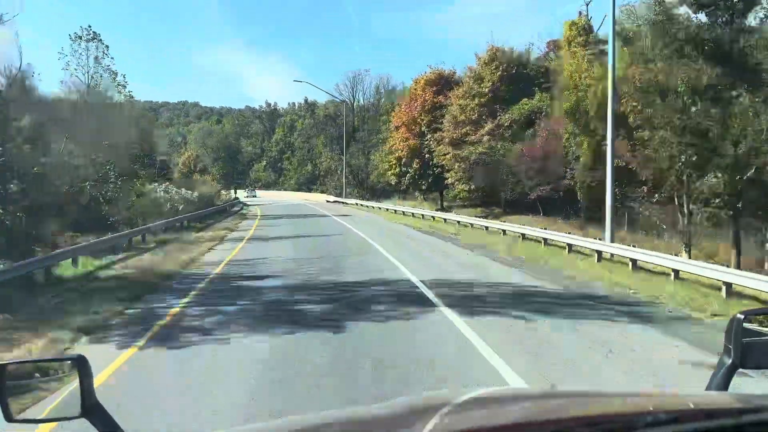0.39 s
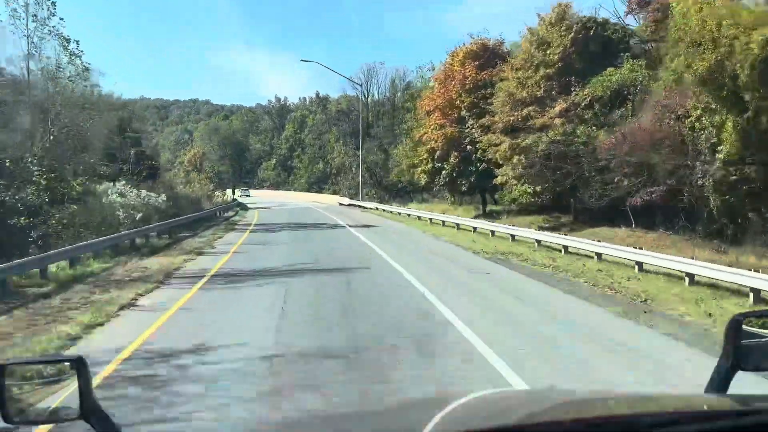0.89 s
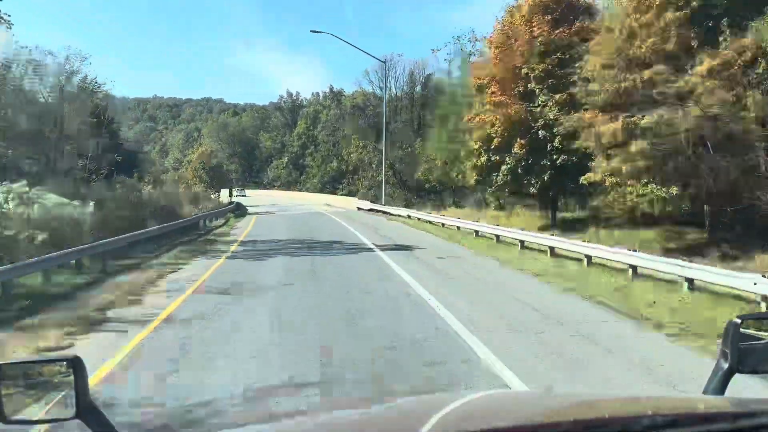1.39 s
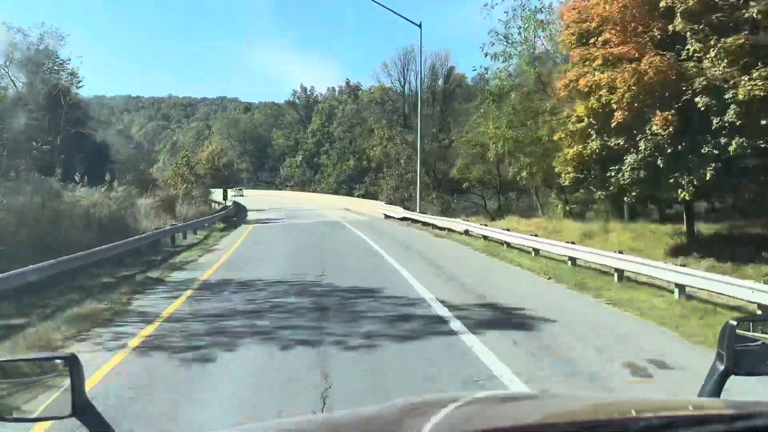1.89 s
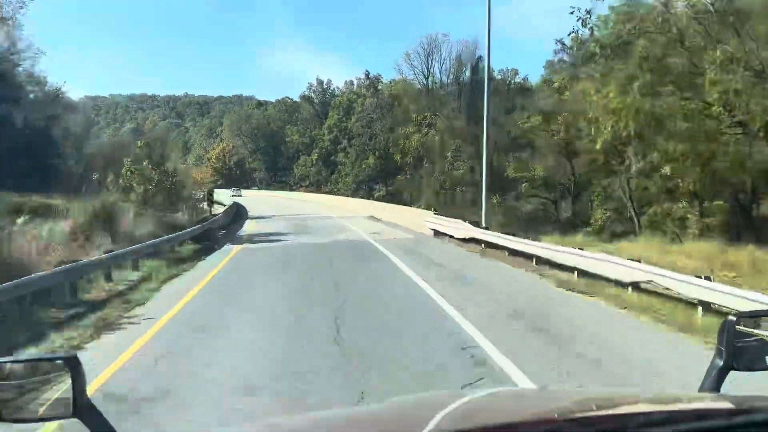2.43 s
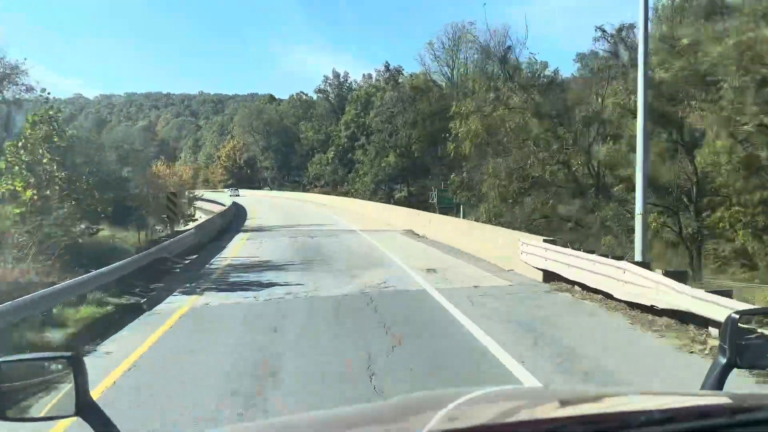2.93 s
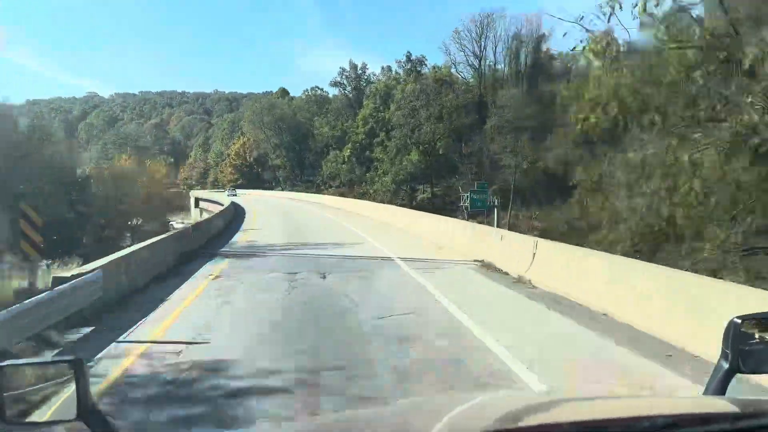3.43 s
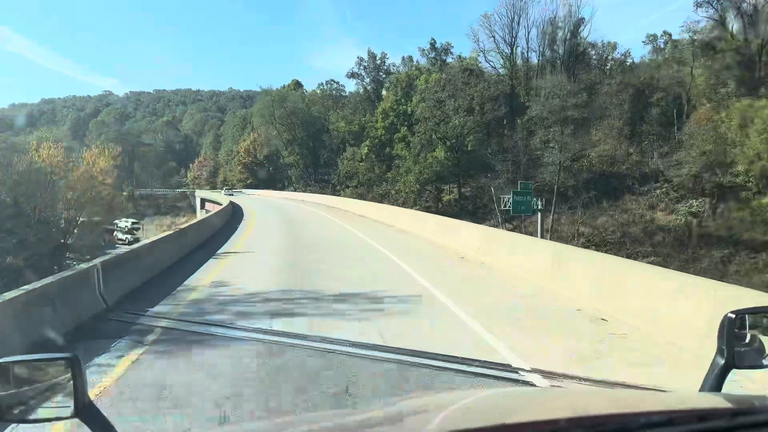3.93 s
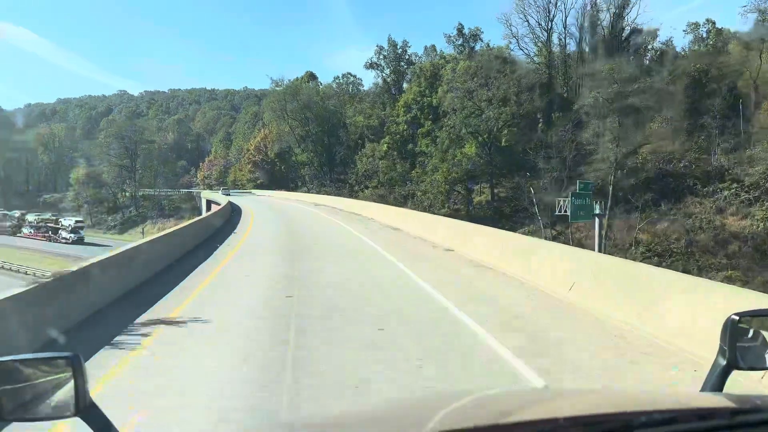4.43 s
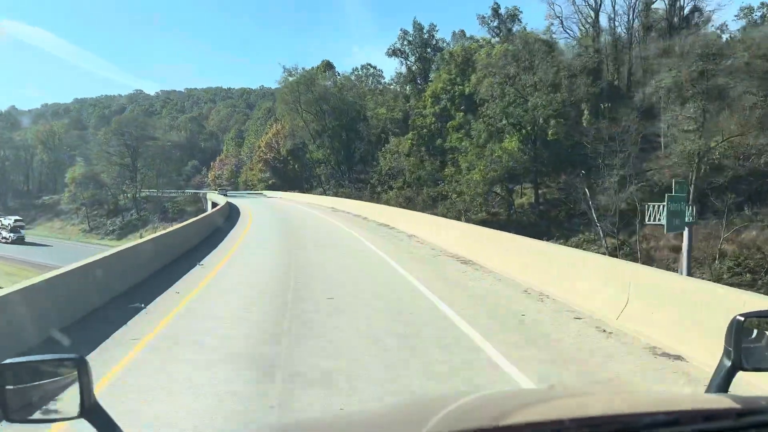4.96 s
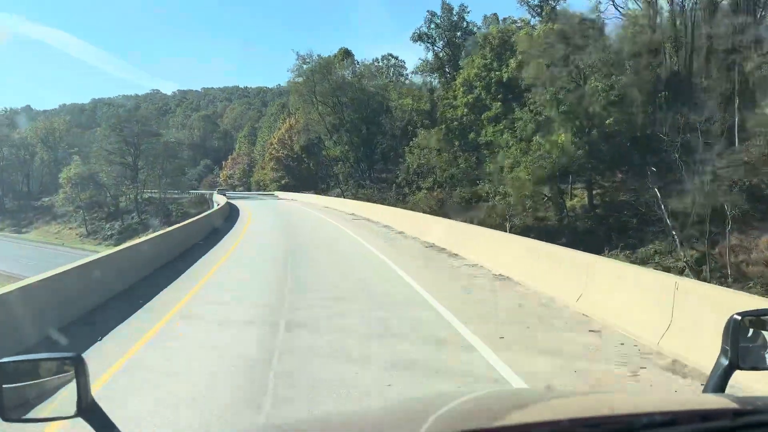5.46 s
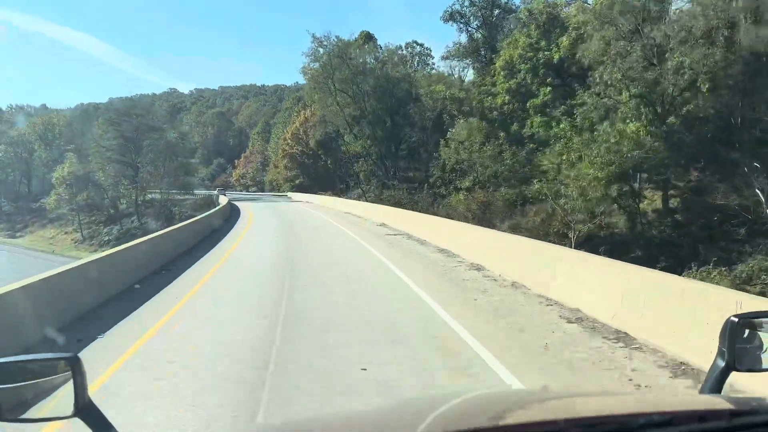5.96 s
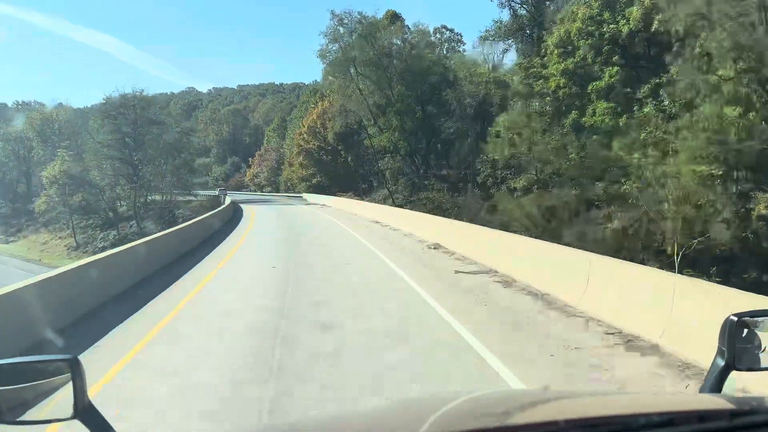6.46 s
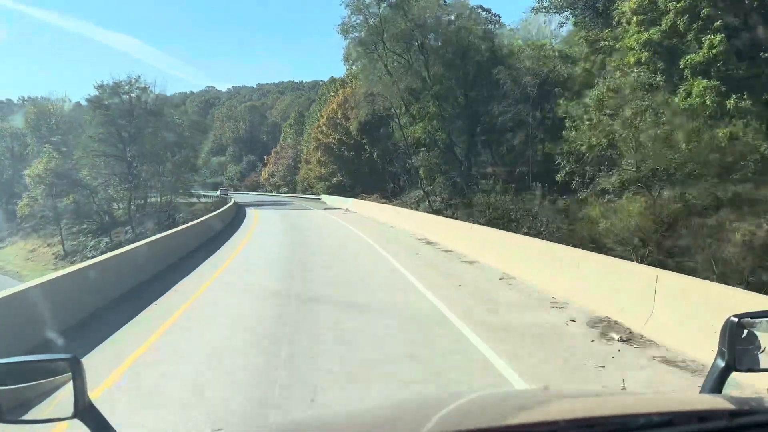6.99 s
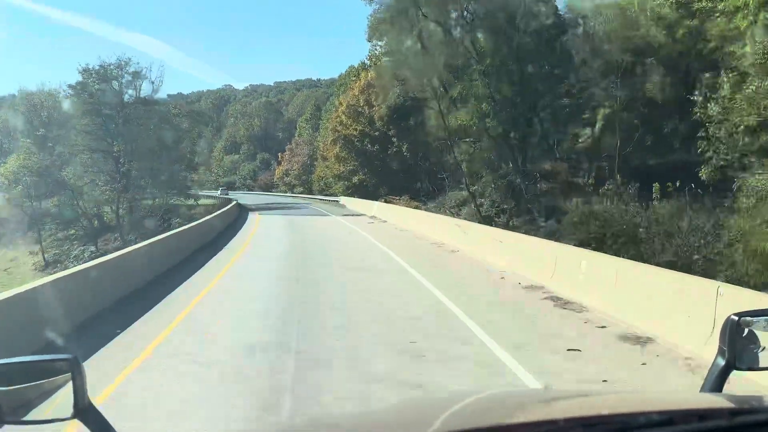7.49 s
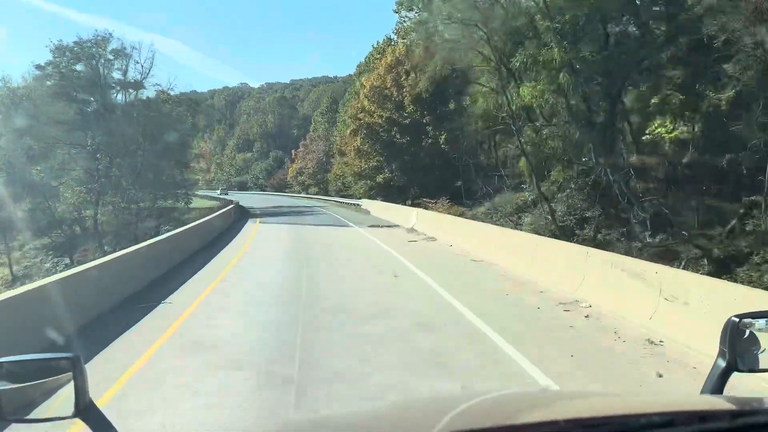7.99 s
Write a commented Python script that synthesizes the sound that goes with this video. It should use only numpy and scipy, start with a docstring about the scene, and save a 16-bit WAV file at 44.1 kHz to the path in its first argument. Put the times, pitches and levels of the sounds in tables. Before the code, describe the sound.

Inside a heavy truck cab, picked up near the windscreen, a low diesel drone holds almost one pitch, slightly wavering, over dense bass rumble, muffled tyre roar and light wind. The first 3.5 seconds are smooth, with tiny panel ticks at 0.3 and 0.9 and a very faint, high turbo whistle between about 1 and 3.3. At 3.55 broken patches hit: rapid dull thuds boom through the cab, tyre noise swells, plastic trim chatters and panels creak. Three dry axle slaps crack over a bridge joint at 4.26, 4.35 and 4.43. Jolts and rattles continue, weakening until 5.3. From 5.6 the engine softens off throttle on smoother concrete; a brief air-valve hiss spits from the left at 5.8, with a tiny one at 6.15. Isolated trim rattles come at 6.6, 7.35 and, strongest, 7.9. Engine power returns around 7.6 and the drone continues to the end near 8.1.

```python
"""Heavy truck cab at steady speed

Heard by a phone near the windscreen: a six-cylinder diesel drones as a stack of wavering cosines under
rumble, roar and wind made of flickering noise bands. A patched stretch jolts ringing body modes, axles slap
a bridge joint in bursts of falling-spectrum noise, trim rattles as noise through plastic modes and panels
creak as narrow noise. The driver eases off for a while, an air valve puffs hiss from the left, and the
turbo whistles faintly as one gliding sine."""
import sys
import numpy as np
from scipy import signal
from scipy.fft import rfft, irfft, next_fast_len
from scipy.io import wavfile
from scipy.ndimage import uniform_filter1d, minimum_filter1d

SR = 44100
rng = np.random.default_rng(int(sys.argv[2]) if len(sys.argv) > 2 else 0)


def makeup_ratio(level_db):
    """Linear amplitude ratio for a level in decibels (20 dB per factor of ten)."""
    decades = np.asarray(level_db, float) / 20
    return 10 ** decades


def file_out(sig):
    """Save sig as 16-bit WAV at sys.argv[1]."""
    # one column per channel
    cols = np.atleast_2d(sig).T
    # limit, then scale
    lim = np.clip(cols, -1, 1)
    pcm = np.round(lim * 32767).astype(np.int16)
    wavfile.write(sys.argv[1], SR, pcm)


N = 358091
T = np.arange(N) / SR  # s
F = np.maximum(np.fft.rfftfreq(next_fast_len(N), 1 / SR), 1)  # Hz

# driver's foot and engine speed: t/s, throttle/0-1, firing f/Hz
THROTTLE = [(0, 0.89, 55.29), (2.3, 0.84, 55.55), (3.5, 1, 55.63), (4.2, 0.71, 56.42), (5.2, 0.72, 56.08),
            (5.6, 0.24, 55.86), (6.2, 0, 55.44), (7.0, 0, 55.27), (7.5, 0.2, 55.48), (7.62, 0.74, 55.62),
            (8.12, 0.67, 55.55)]
# road under the wheels, from smooth asphalt over patches and joint to concrete deck:
# t/s, roughness/1 (1 is very rough)
ROUGHNESS = [(0, 0.09), (3.52, 0.08), (3.55, 0.85), (3.68, 1.11), (3.79, 0.89), (3.9, 0.84), (4.28, 0.8),
             (4.32, 0.3), (4.4, 0.7), (4.55, 0.5), (4.65, 0.86), (4.95, 0.35), (5.6, 0.07), (8.12, 0.17)]

# drone partials: order/multiple of the engine cycle, level/dB at full throttle on a smooth road,
# loss/dB off throttle
ENGINE_ORDERS = [(4, -30.5, 4.5), (5, -42.5, 3), (6, -13, 3), (8, -38, 2.5), (11, -36.5, 3), (12, -15, 15),
                 (14, -36, 6.5), (15, -21.5, 6.5), (16, -37.5, 1.5), (17, -44, 6), (18, -32.5, 3.5),
                 (21, -36.5, 9), (22, -33, 10), (28, -37.5, -1), (43, -43, 2)]
CYLINDERS = 6
SHAKE_DB = 4.5  # extra wavering of the drone, and drop in its level, at roughness 1
ENGINE_PAN_DB = -0.5  # left minus right

# relative spectrum of tyres, wind and engine bay: f/Hz, level/dB
CABIN_SPECTRUM = [(20, -26), (32, -9), (48, -3), (90, -7), (130, -9), (200, -12.5), (280, -16), (350, -21),
                  (540, -23.5), (720, -32.5), (1240, -38.5), (1800, -52.5), (3500, -57), (8350, -56),
                  (10000, -61.5), (13000, -62.5), (15600, -60)]
# cab resonances on top of it: f/Hz, width/Hz, boost/dB
CABIN_BOOMS = [(197.4, 34, 5.5), (387, 14, 4), (548, 13, 2.5), (822, 88, 4), (2400, 1380, 6),
               (6200, 780, 2.5)]
# stereo width of the cabin noise: f/Hz, side minus mid/dB
CABIN_WIDTH = [(60, -14), (200, -7), (380, -4), (700, -0.5), (1290, 2.5), (2380, -2), (8120, -1),
               (12000, 0)]
# stereo lean of the cabin noise: f/Hz, left minus right/dB
CABIN_LEAN = [(110, -3.5), (380, 1), (1290, -1.5), (2380, -1.5), (4400, 3.5), (12000, 0)]
# gain at roughness 1: body rumble/dB, tyre roar/dB, trim buzz/dB
ROUGH_GAINS = (2, 5.5, 4)
CABIN_DB = -21  # centre signal before road gains, flicker and lean
RUMBLE_S, RUMBLE_DB = 3.6, 3.5  # bass rumble is stronger from the rough patch onwards

# loose trim chattering: t/s, ring level/dB, tilt/dB (above 0 a dull knock, below 0 a bright ring)
RATTLES = [(3.553, -52.5, -4), (3.592, -49, 0), (3.659, -44, 3), (3.71, -49, -1.5), (3.773, -47, 7.5),
           (3.966, -57, -18), (4.685, -53, -8), (4.724, -45, -10), (5.069, -47, 0.5), (6.613, -45.5, 0.5),
           (7.347, -41, -2.5), (7.914, -37, -1.5)]
# resonances of the plastic parts: f/Hz, width/Hz, level/dB
TRIM_MODES = [(1110, 450, -2.5), (1460, 140, 3), (1880, 73, -8), (2470, 260, -0.5), (2700, 300, -8),
              (4070, 270, -8), (5530, 300, -9)]
# relative spectrum of the small ticking: f/Hz, level/dB
PATTER_SPECTRUM = [(300, -13.5), (800, 5.5), (1500, -3), (2500, -7.5), (5000, -13.5), (9000, -16.5),
                   (15600, -32.5)]
KNOCK_DB, SIZZLE_DB = 3.5, -10.5  # low and high band against the ring
SIZZLE_TILT = -0.68  # share of the tilt in the high band
SCRAPE_DB = -8  # broad scrape against the modes
PATTER_DB, PATTER_RANGE_DB = -39.5, 17  # ticking at roughness 1; its fall at roughness 0

# panels creaking or clunking on one narrow resonance: t/s, level/dB, f/Hz, length/s
CREAKS = [(0.26, -45, 2400, .012), (0.863, -51, 2400, .01), (3.78, -45, 2710, .02),
          (3.798, -43.5, 1450, 0.035), (4.09, -47, 2150, .04), (4.139, -44, 2640, .02),
          (4.253, -30.5, 1070, 0.011), (4.347, -39, 1880, 0.011), (4.425, -43, 1890, .012),
          (6.611, -45.5, 2320, 0.014), (7.913, -36.5, 2380, 0.018)]
CREAK_WIDTH_HZ = 190

# turbo whistle: t/s, f/Hz, level/dB
TURBO = [(0.9, 9630, -76), (1.7, 9560, -67), (2.37, 9440, -65), (2.9, 9580, -69), (3.3, 9640, -79)]

# wheels over cracks: t/s, push level/dB at 90 Hz, tilt/dB per octave (below 0 a deep thud, above 0 a hard knock)
JOLTS = [(3.555, -19.5, 5), (3.59, -20.5, -3.5), (3.701, -23, -1), (3.80, -21, -4.5), (3.89, -22, -2.5),
         (3.98, -21.5, -5), (4.05, -18.5, 0.5), (4.10, -20.5, 2.5), (4.169, -24, -2), (4.28, -20, -1),
         (4.471, -20.5, -9), (4.625, -20, 2), (4.69, -16.5, -7.5), (4.831, -23.5, -8), (4.951, -28, -6),
         (5.109, -24, -5), (5.26, -30, -10)]
# modes of the cab body: f/Hz, level/dB, decay t60/s
BODY_MODES = [(40.9, 3, 0.26), (60.4, 0, 0.18), (86.6, 6.5, 0.15), (111.9, 3.5, 0.22), (150.4, 2.5, 0.09),
              (205, -1.5, 0.06), (267, -2.5, 0.05), (423, -8, 0.03)]

# axles over the steel joint: t/s, level/dB, spectral corner f/Hz, rise/s
SLAPS = [(4.257, -27.5, 1004, 0.0088), (4.351, -31, 2900, .004), (4.432, -32, 2900, .004)]
SLAP_LOW_SLOPE, SLAP_HIGH_SLOPE = -1.5, -8.5  # dB per octave below and above the corner
SLAP_HOLD_S, SLAP_TAIL_S, SLAP_TOP_HZ = 0.008, 0.016, 8200

# puffs of the air valve: t/s, level/dB before stereo placing, length/s
PUFFS = [(5.758, -47, 0.0022), (5.797, -34, 0.018), (6.148, -43.5, 0.0024)]
# relative spectrum of the hiss: f/Hz, level/dB
PUFF_SPECTRUM = [(2000, -33), (3000, -4), (4000, -11.5), (6000, 2.5), (10000, -6), (13500, -4.5),
                 (16000, -10.5)]

GAP_LOW_HZ, GAP_HIGH_HZ = 10350, 12350  # treble band missing from the centre
MID_TOP_HZ, SIDE_TOP_HZ = 15700, 13100


def lines(x):
    """Sound to spectrum on the frequencies F."""
    return rfft(x, next_fast_len(N))


def wave(spectrum):
    """Spectrum back to sound."""
    return irfft(spectrum, next_fast_len(N))[..., :N]


def curve(table):
    """Columns of a time table, sample by sample."""
    s, *columns = np.transpose(table)
    return [np.interp(T, s, c) for c in columns]


def colour(table, hz=F):
    """Level in dB of a spectrum table at any frequency, drawn on a log frequency axis."""
    f, db = np.transpose(table)
    return np.interp(np.log(hz), np.log(f), db)


def shaped(gain, x):
    """A sound through a spectral gain."""
    return wave(lines(x) * gain)


def rms(x):
    """Root mean square size."""
    return np.sqrt(np.mean(x ** 2))


def unit(x):
    """Scale to rms 1."""
    return x / rms(x)


def walk(rate):
    """Random levels held 1 / rate s and slewed twice; rms about 1."""
    k = int(SR / rate)
    steps = np.repeat(rng.standard_normal(N // k + 1), k)
    return unit(uniform_filter1d(uniform_filter1d(steps, k), k)[:N])


def pan(x, db):
    """Place a sound by its level difference, left minus right."""
    return x * makeup_ratio(np.array([db / 2, -db / 2]).reshape(2, -1))


def ring(x, hz, t60):
    """One mode as a double pole: it swells to about size 1 after a unit push, then dies away."""
    span = t60 * SR / np.log(1000)
    pole = np.exp(2j * np.pi * hz / SR - 1 / span)
    return signal.lfilter([np.e / span], [1, -2 * pole, pole ** 2], x).imag


def burst(s, db, length, rise=.004, tail=.011):
    """Envelope that ramps up, holds until length, then dies away exponentially (times in s)."""
    t = T - s
    return makeup_ratio(db) * np.clip(t / rise, 0, 1) * np.exp(-np.maximum(t - length, 0) / tail)


def engine():
    """Orders of the four-stroke cycle start each cycle nearly in phase; every one wavers a little."""
    throttle, firing_hz = curve(THROTTLE)
    roughness, = curve(ROUGHNESS)
    hz = firing_hz * (1 + .0005 * walk(1.522))
    cycle = 2 * np.pi * np.cumsum(hz / CYLINDERS) / SR
    shake_db = SHAKE_DB * roughness
    drone = 0
    for order, db, loss_db in ENGINE_ORDERS:
        waver_db = 0.45 * walk(2.7) + shake_db * (walk(9) - 1)
        size = makeup_ratio(db - loss_db * (1 - throttle) + waver_db)
        drone = drone + np.sqrt(2) * size * np.cos(order * cycle + 0.057 * walk(7.8))
    return pan(drone, ENGINE_PAN_DB)


def cabin():
    """Overlapping noise bands flicker; rumble rules the bass, tyre roar the middle, buzz the top."""
    roughness, = curve(ROUGHNESS)
    rises = [db * roughness for db in ROUGH_GAINS]
    rises[0] = rises[0] + RUMBLE_DB * (T > RUMBLE_S)
    booms = sum(boost / (1 + ((F - f) / width * 2) ** 2) for f, width, boost in CABIN_BOOMS)
    gain = makeup_ratio(colour(CABIN_SPECTRUM) + booms)
    mid, side = lines(rng.standard_normal((2, N))) * unit(gain) * makeup_ratio(CABIN_DB)
    # in the low middle the roar leads on the left: part of the side is the mid a quarter cycle ahead
    ahead = np.clip(.5 / (1 + np.log2(F / 700) ** 2), 0, 1)
    side = (np.sqrt(1 - ahead ** 2) * side + 1j * ahead * mid) * makeup_ratio(colour(CABIN_WIDTH))
    out, gust = 0, walk(5.4)
    for octave in np.arange(4, 14.5, .5):  # log2 of the band centre in Hz
        window = np.cos(np.pi * np.clip(np.log2(F) - octave, -.5, .5)) ** 2
        m, s = wave(mid * window), wave(side * window)
        # 0 is rumble, 1 roar, 2 buzz; bands in between blend two of them
        region = np.interp(octave, np.log2([80, 500, 3000]), [0, 1, 2])
        rise = sum(max(0, 1 - abs(region - k)) * r for k, r in enumerate(rises))
        flicker = 0.17 * region * gust + 0.93 * walk(14)
        stereo = makeup_ratio(rise + flicker) * np.array([m + s, m - s])
        out = out + pan(stereo, colour(CABIN_LEAN, 2 ** octave))
    return out


def trim():
    """Plastic parts chatter as grainy noise bursts ringing at their modes over a broad scrape."""
    modes = sum(makeup_ratio(db) / (1 + 2j * (F - f) / width) for f, width, db in TRIM_MODES)
    body = makeup_ratio(SCRAPE_DB) * 2000 / (F + 2000) + modes
    body = body * F ** 2 / (F ** 2 + 450 ** 2) / (1 + (F / 8000) ** 2)  # thin bass, soft top
    ticks = rng.standard_normal((2, N)) * makeup_ratio(2.2 * walk(400))
    low, high = 1 / (1 + (F / 1300) ** 6), 1 / (1 + (3300 / F) ** 6)
    bands = low, 1 - low - high, high
    times, ring_db, tilt = np.transpose(RATTLES)
    levels = ring_db + KNOCK_DB + tilt, ring_db, ring_db + SIZZLE_DB + SIZZLE_TILT * tilt
    spectrum = 0
    for band, band_db in zip(bands, levels):
        runs = sum(burst(s, db, .012) for s, db in zip(times, band_db))
        spectrum = spectrum + lines(ticks * runs) * body * band / rms(np.abs(body) * band)
    # a rough road keeps smaller parts ticking between the big knocks
    roughness, = curve(ROUGHNESS)
    patter = makeup_ratio(PATTER_DB + PATTER_RANGE_DB * (roughness - 1) + 3.5 * walk(160))
    return wave(spectrum + lines(ticks * patter) * unit(makeup_ratio(colour(PATTER_SPECTRUM))))


def creaks():
    """Each panel resonance sounds as slow noise on a carrier, fluttering in size and phase."""
    lowpass = 1 / (1 + (2 * F / CREAK_WIDTH_HZ) ** 2)
    along, across = unit(shaped(lowpass, rng.standard_normal((2, 2, N))))
    out = np.zeros((2, N))
    for s, db, hz, length in CREAKS:
        near = slice(int(s * SR), int((s + length + .1) * SR))
        turn = 2 * np.pi * hz * T[near]
        flutter = along[:, near] * np.cos(turn) + across[:, near] * np.sin(turn)
        out[:, near] += burst(s, db, length)[near] * flutter
    return out


def turbo():
    """A thin sine whistle whose pitch sags and recovers, fading in and out."""
    hz, db = curve(TURBO)
    start, end = TURBO[0][0], TURBO[-1][0]
    fade = np.clip((T - start) / .3, 0, 1) * np.clip((end - T) / .3, 0, 1)
    phase = 2 * np.pi * np.cumsum(hz + 3 * walk(12)) / SR
    return np.sqrt(2) * fade * makeup_ratio(db + 2.0 * walk(21)) * np.sin(phase)


def jolts():
    """Each crack pushes the cab and its body modes boom, each time in a new mix."""
    out = 0
    luck = rng.standard_normal((len(JOLTS), len(BODY_MODES)))
    for (hz, mode_db, t60), mix in zip(BODY_MODES, luck.T):
        push = np.zeros(N)
        for (s, jolt_db, tilt_db), chance in zip(JOLTS, mix):
            tilted_db = jolt_db + tilt_db * np.log2(hz / 90)
            push[int(s * SR)] = makeup_ratio(tilted_db + mode_db + 1.9 * chance)
        out = out + ring(push, hz, t60)
    return out


def slaps():
    """Axles crack over the joint: dry broad noise bursts with a ragged tail."""
    out = 0
    for s, db, corner_hz, rise in SLAPS:
        octaves = np.log2(F / corner_hz)
        slope_db = np.minimum(SLAP_LOW_SLOPE * octaves, SLAP_HIGH_SLOPE * octaves)
        gain = makeup_ratio(slope_db) / (1 + (F / SLAP_TOP_HZ) ** 6)
        noise = rng.standard_normal((2, N))
        noise = noise + 0.25 * noise[::-1]  # some of each side in the other
        envelope = burst(s, db, rise + SLAP_HOLD_S, rise=rise, tail=SLAP_TAIL_S)
        grit = noise * makeup_ratio(1.3 * walk(400)) * envelope
        out = out + shaped(unit(gain), grit)
    return out


def valve():
    """Short spits of compressed air from the left: coloured noise in brief envelopes."""
    hiss = unit(shaped(makeup_ratio(colour(PUFF_SPECTRUM)), rng.standard_normal((2, N))))
    hiss = hiss + 0.37 * hiss[::-1]  # some of each side in the other
    puffs = sum(burst(s, db, length, rise=0.0013, tail=0.9 * length + .001) for s, db, length in PUFFS)
    return pan(hiss * puffs, 6.7)


def scene():
    """Everything heard in the cab."""
    return engine() + cabin() + trim() + creaks() + turbo() + jolts() + slaps() + valve()


def roll_off(x):
    """The treble ends steeply here."""
    return signal.sosfilt(signal.butter(12, 15680, fs=SR, output="sos"), x)


def record(dry):
    """The phone cuts deep bass and limits peaks. Apart from that, the centre of the sound lacks one treble band
    and the sides stop lower in the treble."""
    edge_fade = np.clip(np.minimum(T, T[::-1]) / .005, 0, 1)
    dry = shaped(1 / (1 - 1j * 25 / F) ** 2, dry) * edge_fade
    # limiter: lowest gain nearby, smoothed, shared by both channels
    room = np.minimum(1, .94 / (np.abs(dry).max(axis=0) + 1e-9))
    soft = dry * uniform_filter1d(minimum_filter1d(room, size=801), size=801)
    mid_pass = (F < GAP_LOW_HZ) | ((F > GAP_HIGH_HZ) & (F < MID_TOP_HZ))
    mid = shaped(mid_pass, soft[0] + soft[1]) / 2
    side = shaped(F < SIDE_TOP_HZ, soft[0] - soft[1]) / 2
    return roll_off(np.array([mid + side, mid - side]))


dry = scene()
out = record(dry)
file_out(out)
```